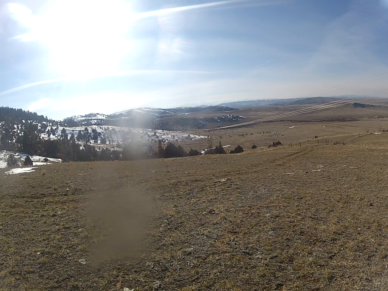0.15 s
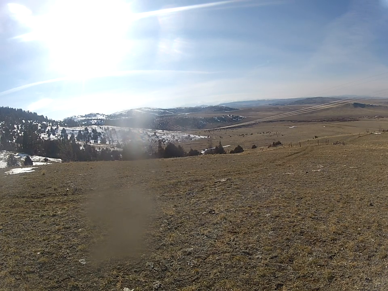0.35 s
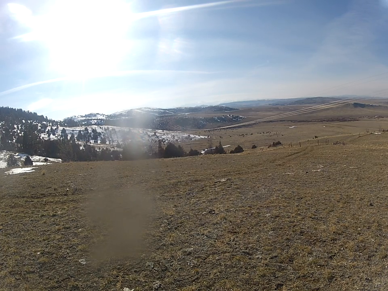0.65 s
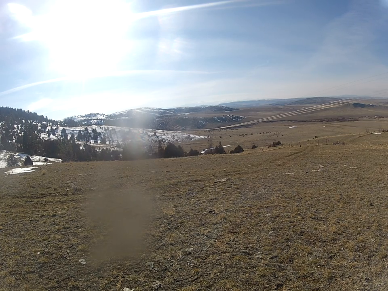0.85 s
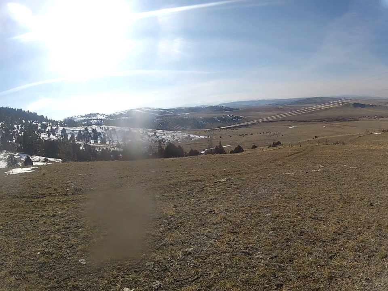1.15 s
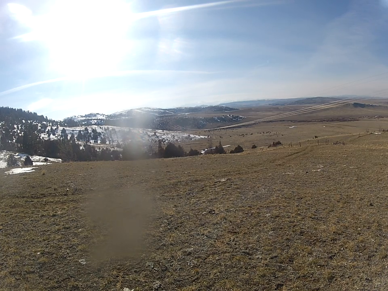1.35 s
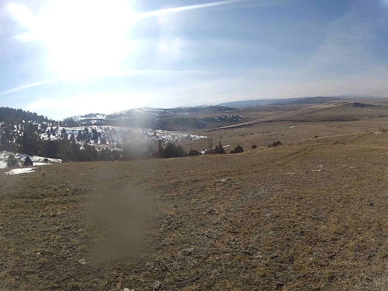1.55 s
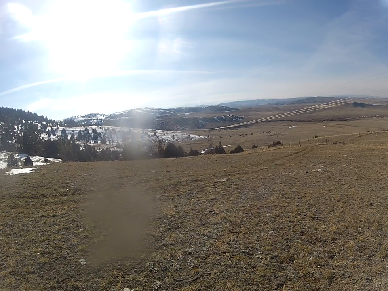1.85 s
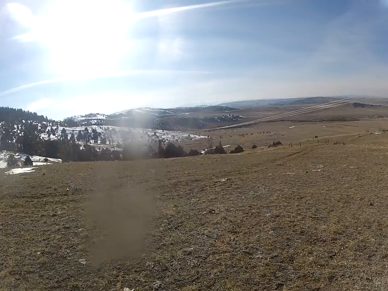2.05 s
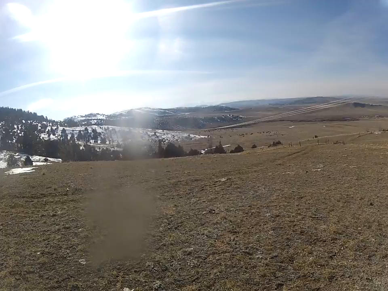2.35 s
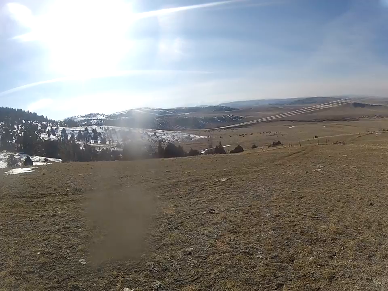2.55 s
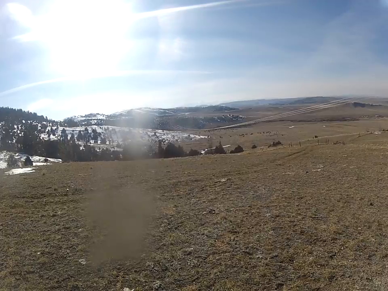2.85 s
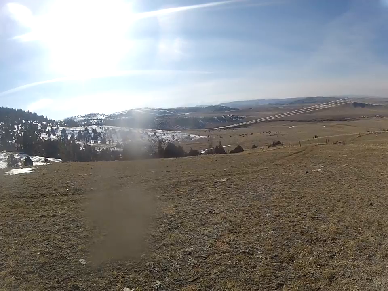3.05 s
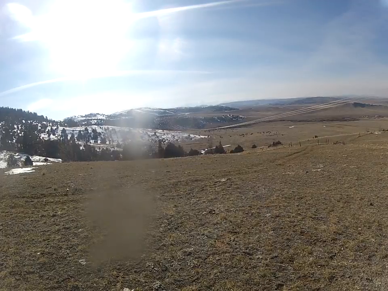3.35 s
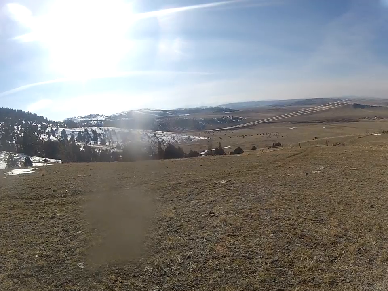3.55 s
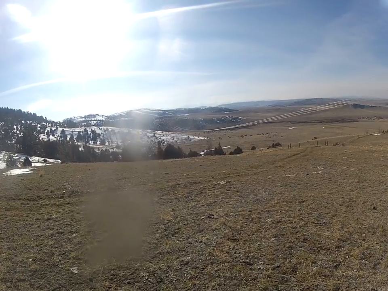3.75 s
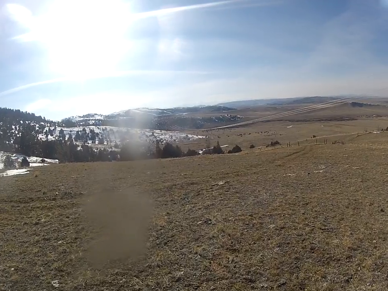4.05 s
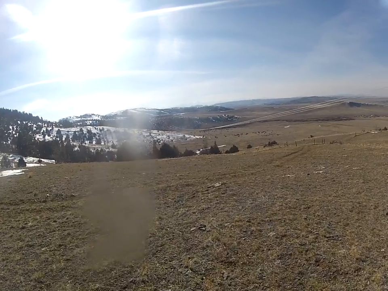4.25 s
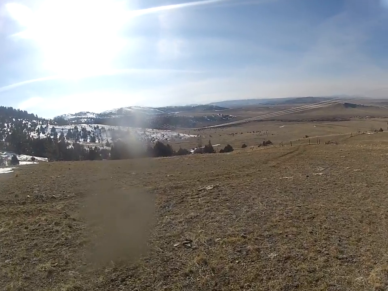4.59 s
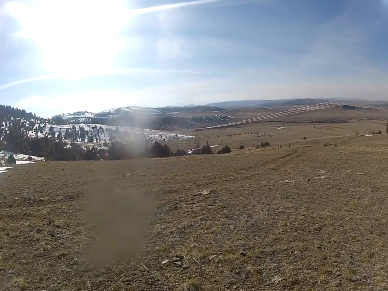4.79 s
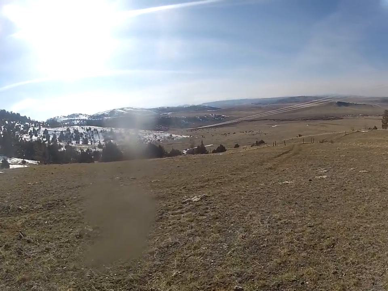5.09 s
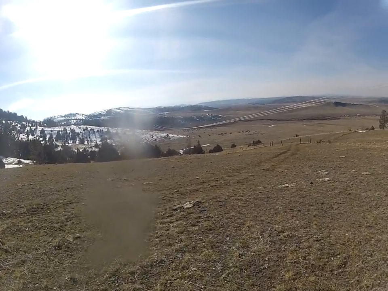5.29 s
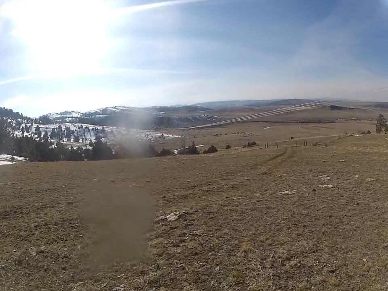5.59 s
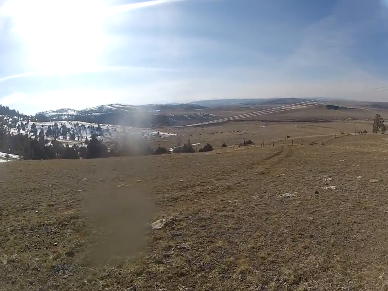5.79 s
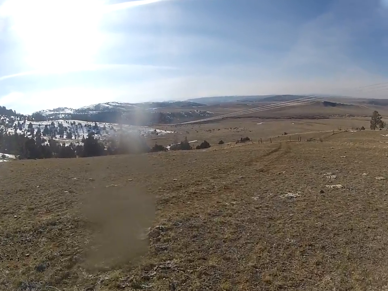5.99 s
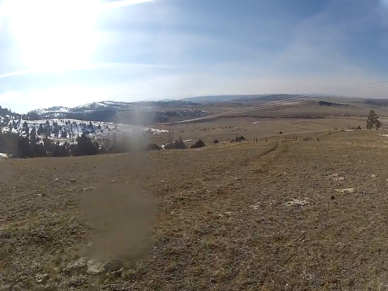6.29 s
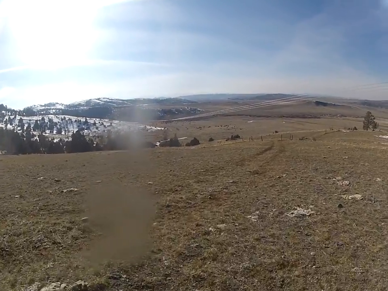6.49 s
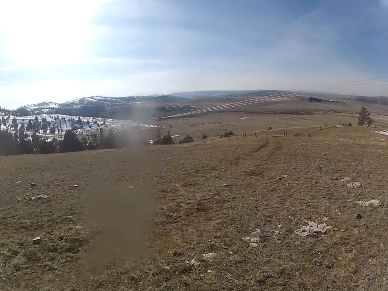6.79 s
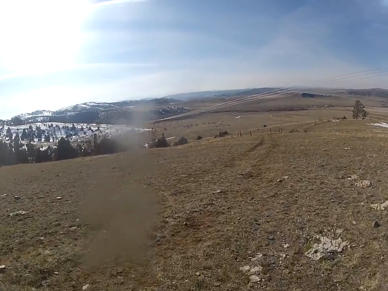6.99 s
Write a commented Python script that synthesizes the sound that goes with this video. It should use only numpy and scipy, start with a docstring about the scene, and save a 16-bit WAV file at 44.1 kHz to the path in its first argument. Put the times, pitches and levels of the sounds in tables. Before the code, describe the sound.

From 0 to 1.3 seconds a heavy vehicle idles very quietly beneath a constant hollow plastic rattle, thin wind hiss and low panel rumble; a knock at 0.6 and a quick cluster from 0.85 to 1.0 tap the housing. From 1.4 to 1.8 deep jolts shake the mount and the engine takes up load, becoming a strong, nearly pure bass throb just under 50 hertz, slowly beating from 2.2 to 3.4. At 3.49 a hard slam bursts out, clipped and boxy, with the level ducking just after. Small knocks and faint bright buzzing follow until 4.6, while rattle swells around 4.5. The bass then weakens and rises slightly. From 5.5 the vehicle rolls over stones: soft jolts, gritty crunches, a brief buzz near 6.4, and the densest crunching and rumble around 6.8, continuing to the end at 7.1. The close microphone sounds coarse, with metallic treble.

```python
"""Vehicle-borne camera on rough grass

A small camera in a plastic housing rides outside a heavy vehicle that idles, takes up drive and rolls over rough grass.
Engine firing and the springy mount give two close low pitches that beat: harmonic sums and a struck oscillator.
Wind, loose parts, jolts and a hard slam, made of noise and taps, excite resonances of the housing, panels and frame.
The sum passes gain control and clipping, then is sampled coarsely and held, which mirrors it in the treble."""
import sys
import numpy as np
from scipy import signal
from scipy.io import wavfile

SR = 44100
rng = np.random.default_rng(int(sys.argv[2]) if len(sys.argv) > 2 else 0)


def pcm_store(signal):
    """Save signal as 16-bit PCM."""
    levels = np.round(np.clip(np.atleast_2d(signal), -1, 1) * 32767)
    wavfile.write(sys.argv[1], SR, levels.astype(np.int16).T)


N = 314433  # length in samples


# engine firing: (t/s, firing f/Hz, rms level/dB)
ENGINE = [(0.0, 43.25, -52.1), (1.45, 43.07, -42.0), (1.7, 45.43, -24.4), (1.95, 44.25, -30.8),
          (2.2, 47.56, -18.5), (2.5, 49.04, -18.7), (3.2, 49.26, -19.6), (3.5, 48.06, -17.8),
          (3.9, 49.46, -27.7), (4.2, 47.34, -19.5), (4.45, 48.52, -19.6), (4.95, 53.12, -27.7),
          (5.7, 52.68, -27.7), (6.45, 54.26, -31.3), (7.13, 54.75, -28.8)]
# base levels of the partials beside the firing pitch: (t/s, lumpy orders level/dB, load orders level/dB)
ORDER_LEVELS = [(0.0, -46.5, -65), (1.4, -73.5, -55.5), (2.2, -63, -51), (3.2, -56, -48.5),
                (3.7, -58.5, -51), (4.3, -51.5, -57), (5.2, -55, -61), (7.13, -53, -72)]
# partials strongest at the lumpy idle: (multiple of firing f, relative level/dB)
IDLE_ORDERS = [(0.752, -34), (1.248, -27), (1.5, -13), (1.75, -16), (2, 3.5), (6, -5), (9, -10.5)]
# partials under load: (multiple of firing f, relative level/dB)
LOAD_ORDERS = [(1.402, -17), (3, -3), (4.5, -21), (6, -12.5)]


def shake():
    """Superposition: the near-sine firing and its weaker orders beat with the ringing mount."""
    firing_hz, firing_db = in_time(ENGINE)
    phase = 2 * np.pi * np.cumsum(firing_hz) / SR
    engine = from_db(firing_db) * np.cos(phase)
    for orders, level_db in zip((IDLE_ORDERS, LOAD_ORDERS), in_time(ORDER_LEVELS)):
        partials = 0
        for multiple, order_db in orders:
            partials = partials + from_db(order_db + 3.4 * drift(3.8)) * np.cos(multiple * phase)
        engine += from_db(level_db) * partials
    return np.sqrt(2) * engine + mount()


# jolts through the frame that set the mount swinging, or stop it: (t/s, swing peak level/dB of each alone)
JOLTS = [(1.3925, -21), (1.5613, -13.5), (1.6727, -13.0), (1.7743, -18.9), (1.7876, -15.4), (3.0377, -28.8),
         (3.4826, -15.7), (3.5096, -10.5), (3.6257, -11.4), (3.6412, -22.4), (3.7813, -13.4),
         (4.4734, -25.4), (4.7579, -21.3), (5.2593, -18.0), (5.5228, -25.6), (5.6507, -19.0),
         (5.8959, -27.5), (6.0539, -23.7), (6.2216, -20.6), (6.2907, -15.6), (6.3583, -16.7),
         (6.4065, -20.1), (6.5273, -20.4), (6.6688, -21.6), (6.9087, -13.7), (7.0347, -20.5)]
MOUNT_HZ, MOUNT_DECAY_S, JOLT_MS = 46.8, 0.216, 14.0
MOUNT_TREMBLE_DB = -38  # restless swing that never stops


def mount():
    """Damped oscillator: each jolt's short shudder drives one slow mode, over a faint random tremble."""
    t = np.arange(N) / SR
    omega = 2 * np.pi * MOUNT_HZ
    width = JOLT_MS / 1000
    push = 0
    for s, db in JOLTS:
        push = push + from_db(db) * np.exp(-((t - s) / width) ** 2 / 2) * np.cos(omega * (t - s))
    push = 2 * push / (np.sqrt(2 * np.pi) * width * SR)  # makes the table level the peak of the swing
    r = np.exp(-1 / (MOUNT_DECAY_S * SR))
    poles = [1, -2 * r * np.cos(omega / SR), r * r]
    swing = signal.lfilter([0, np.sin(omega / SR)], poles, push + 1e-18)
    tremble = body([(47.4, 2.9, 0), (46.3, 8.9, 0)], soft(rng.standard_normal(N), hz=69.6))
    return swing + from_db(MOUNT_TREMBLE_DB) * rms_one(tremble)


# spells in which a loose part ticks twice in each firing cycle: (start t/s, end t/s, level/dB before fades)
BUZZ = [(3.546, 4.6, -57), (6.306, 6.55, -54.5)]
BUZZ_FADE_S = 0.14


def buzz():
    """Amplitude modulation: noise gated into two short bright puffs for each firing."""
    phase = 2 * np.pi * np.cumsum(in_time(ENGINE)[0]) / SR
    puffs = rms_one(np.cos(phase) ** 12 * rng.standard_normal(N))
    t = np.arange(N) / SR
    level = 0
    for start, end, db in BUZZ:
        fade = np.clip(np.minimum(t - start, end - t) / BUZZ_FADE_S, 0, 1)
        level = level + from_db(db) * fade
    return body([(4780, 360, 0), (5300, 600, 0.5)], level * puffs + 1e-18)


# resonances of the plastic shell: (f/Hz, width/Hz, relative level/dB)
SHELL = [(830.5, 16, -12), (1190, 400, -10.5), (1437, 45, -4.5), (1646, 110, -9.5), (1796, 22, -4),
         (1823, 17, 1.5), (1949, 49, 1), (2066, 22.3, 3), (2146, 168, -5), (2316, 125, -5), (2464, 47, -6),
         (2531, 15.4, -2), (2681, 60, -9), (3108, 56, -16), (3543, 151, -14)]
# resonances of the air cavity inside: (f/Hz, width/Hz, relative level/dB)
CAVITY = [(1258, 72.6, 0), (1304, 34.5, 3), (1342, 67, -15.5)]
# deep resonances of the frame: (f/Hz, width/Hz, relative level/dB)
DEEP = [(30, 49.3, -4.5), (63, 20.5, 4), (86, 12.2, -5), (118.6, 44, -5), (137.5, 78.5, -11)]
SLAM_S, SLAM_MS = 3.4903, 5.0  # onset, length of full contact
SLAM_SHELL_DB, SLAM_CAVITY_DB, SLAM_THUD_DB = -11, -11, -18.5  # shell and cavity before their high-pass
SLAM_DAMPING = 4.0  # times the width: pressed against its stop, the housing rings with wider resonances


def slam():
    """Damped impact: the suspension bottoms out in a few milliseconds of hard contact."""
    ms = 1000 * (np.arange(N) / SR - SLAM_S)
    envelope = (ms >= 0) * np.exp(-np.clip(ms - SLAM_MS, 0, 500) / 0.7)
    push = envelope * soft(rng.standard_normal(N), hz=4000)

    def damped(modes):
        """Damping: a lossier mode has a wider resonance."""
        return [(hz, SLAM_DAMPING * width, db) for hz, width, db in modes]

    ring = from_db(SLAM_SHELL_DB) * body(damped(SHELL), push)
    ring += from_db(SLAM_CAVITY_DB) * body(damped(CAVITY), push)
    return stiff(stiff(ring)) + from_db(SLAM_THUD_DB) * body(damped(DEEP), push)


# knocks on the housing: (t/s, shell level/dB, cavity level/dB, thud level/dB)
KNOCKS = [(0.608, -28.5, -33, -35.5), (0.851, -32.5, -35, -41), (0.9143, -29.5, -39, -36),
          (0.9596, -35.5, -43, -45), (0.9965, -28.5, -29.5, -36.5), (1.3635, -45, -47, -44),
          (1.5258, -49, -41.5, -36.5), (3.641, -39, -36, -52), (3.684, -35, -39, -51),
          (3.9263, -48.5, -40, -50), (3.9863, -58, -41.5, -67), (4.5686, -45, -43, -49.5),
          (4.8687, -39, -38.5, -55.5), (6.2545, -38, -39, -57)]
# resonances of the body panels: (f/Hz, width/Hz, relative level/dB)
PANELS = [(224.2, 10.6, 1.5), (284.8, 49.3, -7.5), (407, 36, -11.5), (519, 274, -22.5)]
FIRST_BLOW = 7.5  # first contact as a multiple of the chatter's rms
CHATTER_MS, TAIL_MS = 9.5, 22  # steady chatter, then its decay time
THUD_DEEP_DB = -15  # frame's thud relative to the panels'


def knocks():
    """Impact excitation: a first blow and a dying chatter ring the housing; panels and frame thud."""
    ms = np.arange(SR // 5) * 1000 / SR
    contacts = soft(grains(3000, 2.0, 1.0), hz=5100)
    blow = FIRST_BLOW * np.exp(-(ms / 0.073 - 2) ** 2)
    chatter_decay = np.exp(-np.maximum(ms - CHATTER_MS, 0) / TAIL_MS)
    pushed = np.zeros((3, N))
    for s, *levels_db in KNOCKS:
        start = round(s * SR)
        span = slice(start, start + len(ms))
        push = chatter_decay * contacts[span] + blow
        pushed[:, span] += from_db(levels_db)[:, None] * push
    shell, cavity, thud = pushed
    housing = body(SHELL, shell) + body(CAVITY, cavity)
    return housing + body(PANELS, thud) + from_db(THUD_DEEP_DB) * body(DEEP, thud)


# chatter of the housing on its mount: as a wheel crosses stones, and just before and after the slam:
# (t/s, swell/ms, ebb/ms, shell level/dB, cavity level/dB)
CRUNCHES = [(3.464, 18, 49, -34.5, -28), (3.498, 1.7, 26, -32, -36), (5.478, 3.4, 83, -31.5, -31.5),
            (5.672, 5.6, 48, -40.5, -38), (5.722, 38, 57, -31.5, -31), (5.817, 8.1, 30, -33, -38.5),
            (6.095, 83, 57, -30.5, -31.5), (6.497, 29, 71, -33, -31), (6.695, 9.2, 83, -43.5, -36),
            (6.771, 5.0, 45, -33.5, -30), (6.818, 15, 57, -25, -29.5), (6.875, 49.6, 36, -26.5, -27),
            (6.982, 3, 21, -37, -33)]


def crunches():
    """Granular excitation: dense uneven taps that swell to a rounded top and ebb."""
    ms = np.arange(N) * 1000 / SR
    shell, cavity = np.zeros(N), np.zeros(N)
    for s, swell_ms, ebb_ms, shell_db, cavity_db in CRUNCHES:
        shape = np.sqrt(np.interp(ms - 1000 * s, [0, swell_ms, swell_ms + ebb_ms], [0, 1, 0]))
        shell += from_db(shell_db) * shape
        cavity += from_db(cavity_db) * shape
    taps = stiff(soft(grains(2500, 2.5, 1.0), hz=4570))
    return body(SHELL, shell * taps) + body(CAVITY, cavity * taps)


# how hard wind and shaking work the housing: (t/s, shell level/dB)
RATTLE = [(0.0, -41), (1.03, -40.5), (1.81, -44), (2.1, -42), (2.32, -36.5), (2.44, -37.5), (2.68, -42),
          (3.16, -41.5), (3.59, -43), (3.79, -39), (4.55, -34.5), (5.06, -41.5), (5.3, -42), (5.72, -39),
          (6.55, -40.5), (7.01, -36.5), (7.13, -38.5)]
CAVITY_DB, CAVITY_FOLLOWS, CAVITY_WANDER_DB = -40, 1.01, 1  # base level, dB per dB of rattle, spread


def rattle():
    """Forced resonance: loose parts tap and wind rubs, so shell and air cavity ring."""
    shell_db, = in_time(RATTLE)
    cavity_db = CAVITY_DB + CAVITY_FOLLOWS * worked_db() + CAVITY_WANDER_DB * drift(4.9)
    taps = grains(1500, 2.8, 0.57) * from_db(0.5 * drift(5.6))
    return body(SHELL, from_db(shell_db) * taps) + body(CAVITY, from_db(cavity_db) * taps)


def worked_db():
    """Level variation: swing of the rattle about its mean, in dB."""
    shell_db, = in_time(RATTLE)
    return shell_db - shell_db.mean()


# engine, tyres and wind in the panels: (t/s, level/dB before drift)
RUMBLE = [(0.0, -46), (1.57, -45.5), (1.67, -48), (1.89, -51), (2.48, -48), (4.03, -45.5), (4.27, -48.5),
          (6.47, -44.5), (6.77, -38.5), (7.13, -43)]
DEEP_DB, DEEP_WANDER_DB = -47.5, 3  # base level, spread of the slow drift


def rumble():
    """Random vibration: drifting noise drives the frame, lumpy grains the body panels."""
    deep_db = DEEP_DB + DEEP_WANDER_DB * drift(2.7) + 1.8 * drift(15)
    deep = body(DEEP, from_db(deep_db) * rng.standard_normal(N))
    panel_db = in_time(RUMBLE)[0] + 1.8 * drift(38)
    return deep + body(PANELS, from_db(panel_db) * grains(400, 1.44, 1.47))


# resonances of the port that colour the wind: (f/Hz, width/Hz, relative level/dB)
PORT = [(3155, 1010, -5), (3984, 283, 3), (4430, 1070, -8.5), (5400, 380, -5.5), (5587, 138, -4)]
HISS_DB, HISS_FOLLOWS = -51, 0.25  # base level, dB per dB of rattle


def hiss():
    """Filtered turbulence: smooth wind noise that rises with the rattle."""
    level_db = HISS_DB + HISS_FOLLOWS * worked_db() + 1.02 * drift(11.5)
    return body(PORT, from_db(level_db) * rng.standard_normal(N))


def from_db(db):
    """Decibel law: 20 dB is a factor of ten in amplitude."""
    return 10 ** (np.asarray(db) / 20)


def rms_one(x):
    """Normalisation: scales a signal to rms 1."""
    return x / np.sqrt(np.mean(x ** 2) + 1e-20)


def in_time(rows):
    """Linear interpolation: spreads each column over all samples."""
    s, *columns = np.transpose(rows)
    return [np.interp(np.arange(N) / SR, s, c) for c in columns]


def drift(rate):
    """Low-passed noise: a slow random course of spread 1, with corner rate in Hz."""
    r = np.exp(-2 * np.pi * rate / SR)
    slow = signal.lfilter([1], [1, -2 * r, r * r], rng.standard_normal(N + SR))
    return rms_one(slow[SR:])  # the first second only settles the filter


def body(modes, x):
    """Modal superposition: parallel resonances of alternating sign; white noise keeps its rms."""
    click = np.zeros(SR // 4)
    click[0] = 1
    out, response = 0, 0
    for k, (hz, width, db) in enumerate(modes):
        r = np.exp(-np.pi * width / SR)
        b = (-1) ** k * from_db(db) * (1 - r * r) / 2 * np.array([1, 0, -1])
        a = [1, -2 * r * np.cos(2 * np.pi * hz / SR), r * r]
        out = out + signal.lfilter(b, a, x)
        response = response + signal.lfilter(b, a, click)
    return out / np.sqrt(np.sum(response ** 2))


def grains(per_s, spread_db, bed):
    """Shot noise: random taps of uneven size on a bed of noise; rms 1."""
    sizes = from_db(spread_db * np.minimum(rng.exponential(1, N), 4))
    signed_sizes = sizes * rng.choice([-1, 1], N)
    taps = rms_one(signed_sizes * (rng.random(N) < per_s / SR))
    return rms_one(taps + bed * rng.standard_normal(N))


def soft(x, hz):
    """Contact compliance: a yielding contact loses its treble; rms 1."""
    return rms_one(signal.sosfilt(signal.butter(2, hz, fs=SR, output="sos"), x))


def stiff(x):
    """Contact stiffness: hard contacts barely move the shell below 1040 Hz."""
    return signal.sosfilt(signal.butter(2, 1040, "high", fs=SR, output="sos"), x)


def scene():
    """Linear superposition: the sum of all sources."""
    return (shake() + rumble() + rattle() + hiss() + buzz() + crunches() + knocks() + slam())[None]


LIMIT_DB, REACT_MS, ATTACK_MS = -6, 5.5, 0.4
RELEASE_DB_PER_S, DUCK_RATIO = 90, 0.9  # fall of the held excess, dB of ducking per dB of excess
HOLD_HZ, CUTOFF_HZ = 12000, 15700  # sampling rate of the hold, stopband edge of the last filter


def record(dry):
    """Compression and imaging: gain ducks after loud peaks; a coarse sample-and-hold mirrors the spectrum."""
    fall = RELEASE_DB_PER_S * np.arange(N) / SR
    over_db = np.maximum(20 * np.log10(np.abs(dry[0]) + 1e-9) - LIMIT_DB, 0)
    held_over_db = np.maximum.accumulate(over_db + fall) - fall
    # it reacts late, so a hard blow clips first
    late_db = np.r_[np.zeros(round(REACT_MS * SR / 1000)), held_over_db][:N]
    attack = np.exp(-1000 / (ATTACK_MS * SR))
    duck_db = DUCK_RATIO * signal.lfilter([1 - attack], [1, -attack], late_db)
    clipped = np.clip(dry[0] * from_db(-duck_db), -0.62, 0.55)
    coarse = signal.resample_poly(clipped, HOLD_HZ // 300, SR // 300, window=("kaiser", 8))
    stairs = np.repeat(coarse, 4)  # each sample held for four steps
    held = signal.resample_poly(stairs, SR // 300, 4 * HOLD_HZ // 300)[:N]
    held = np.pad(held, (0, N - len(held)))
    low_pass = signal.cheby2(16, 80, CUTOFF_HZ, fs=SR, output="sos")
    return signal.sosfilt(low_pass, held)[None]


dry = scene()
out = record(dry)
pcm_store(out)
```